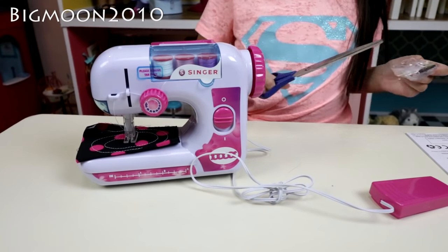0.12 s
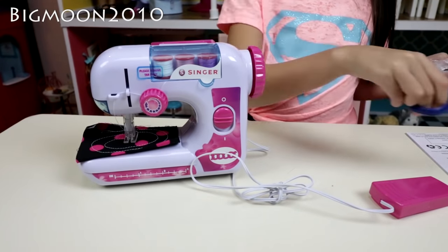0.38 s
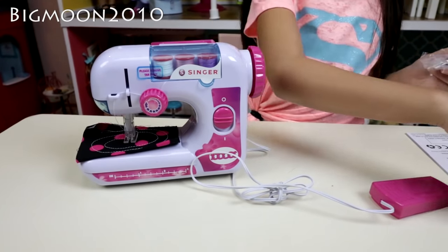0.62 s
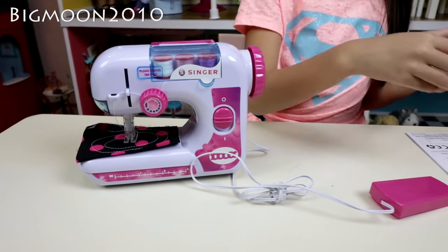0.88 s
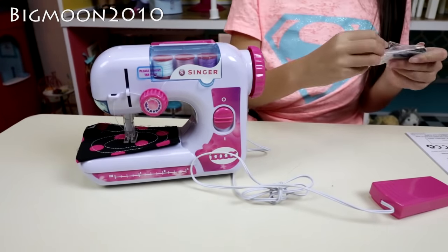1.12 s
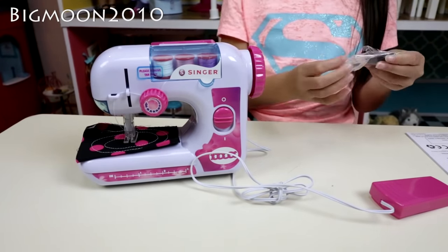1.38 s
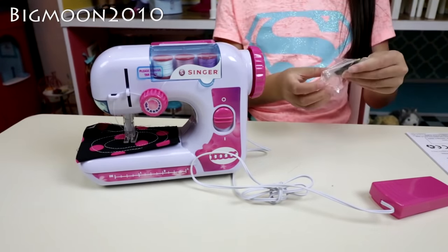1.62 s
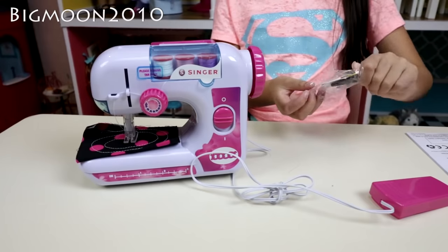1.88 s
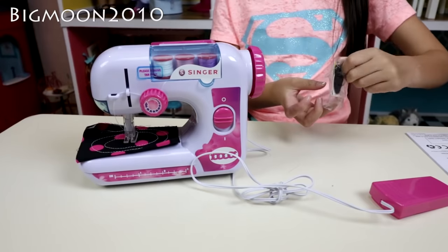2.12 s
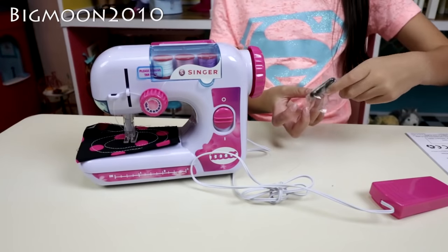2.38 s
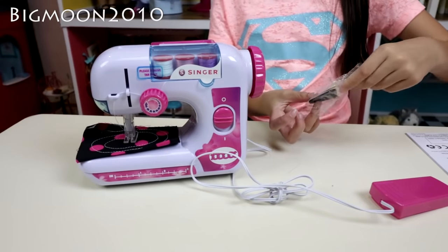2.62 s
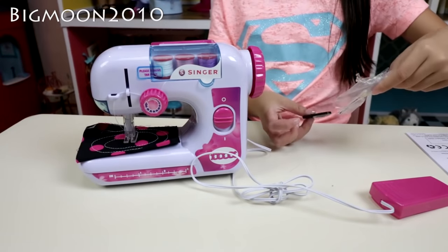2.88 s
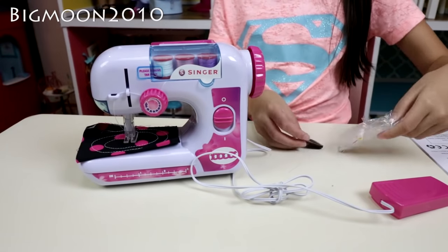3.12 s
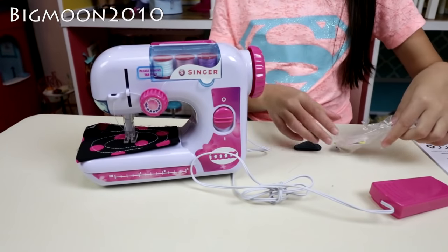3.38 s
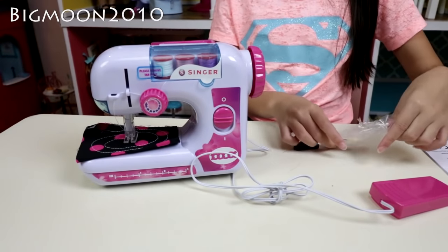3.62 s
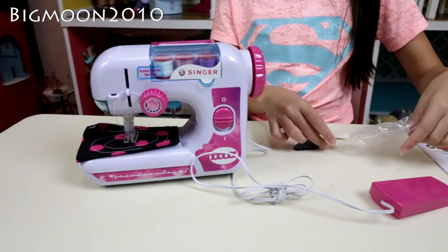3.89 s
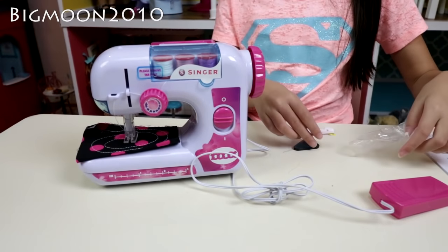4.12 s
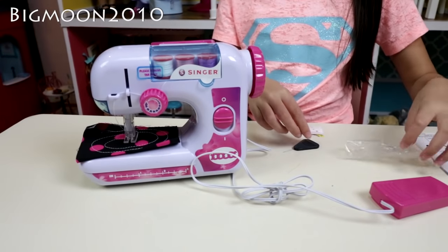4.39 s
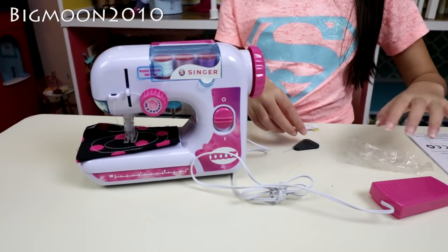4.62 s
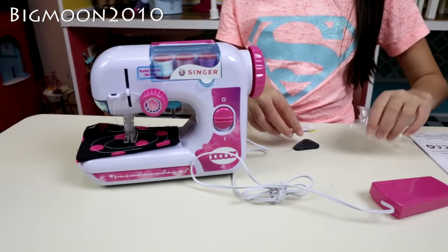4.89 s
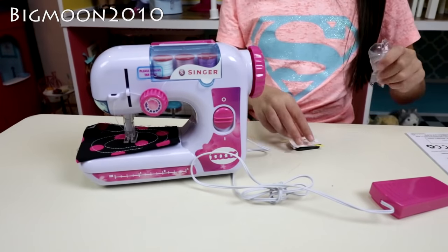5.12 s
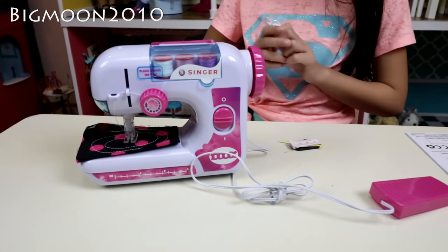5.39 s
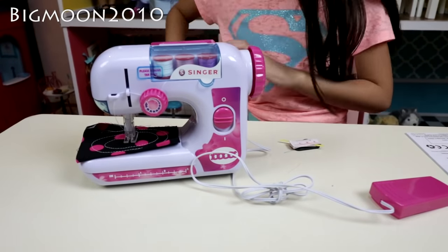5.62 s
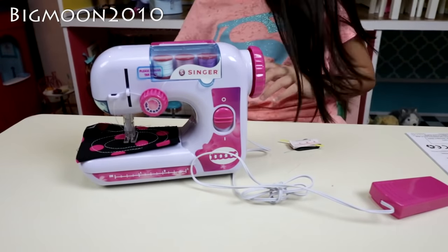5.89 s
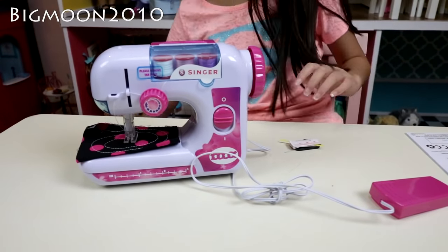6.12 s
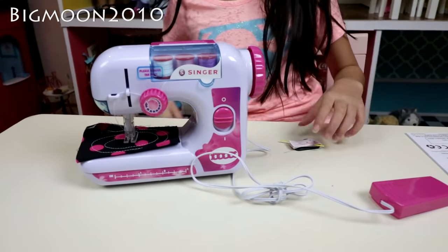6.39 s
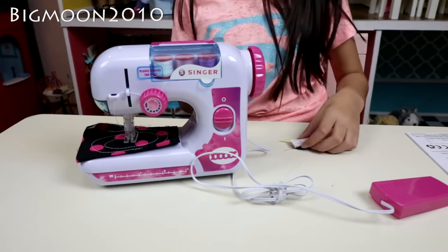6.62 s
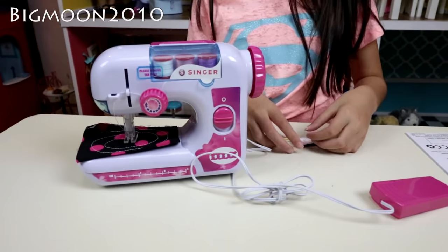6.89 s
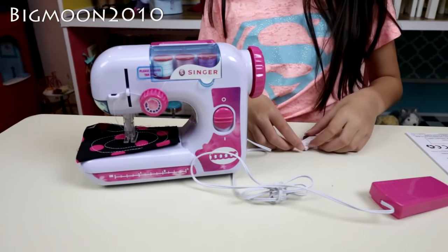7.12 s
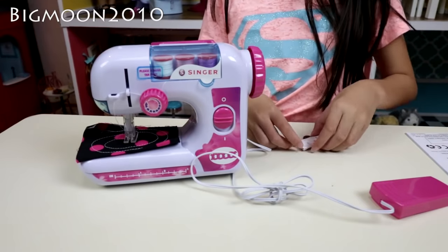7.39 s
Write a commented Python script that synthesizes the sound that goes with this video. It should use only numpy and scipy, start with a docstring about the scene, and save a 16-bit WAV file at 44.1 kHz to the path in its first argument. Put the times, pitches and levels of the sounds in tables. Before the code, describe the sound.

Scissors clatter loudly onto a table, then a thin plastic packet crinkles in crisp irregular bursts, with tiny hard parts ticking down in a small room.

```python
"""A thin plastic packet is crinkled and shaken out by hands at a table in a small furnished room:
film creases snap as short noise puffs with a brief sine ring, over a rustle of tiny random contacts.
Scissors drop and bounce: noise cracks, ringing modes and a slow sway of the board.
Small hard parts tick, ring high and chatter as they slide; the empty packet drops out of sight with a knock.
A stereo pair hears most of it from the right, with dense decaying reflections and steady noise."""
import sys
import numpy as np
from scipy import signal
from scipy.fft import rfft, irfft, next_fast_len
from scipy.io import wavfile

SR = 44100
rng = np.random.default_rng(int(sys.argv[2]) if len(sys.argv) > 2 else 0)


def waveform_to_disk(signal):
    """Save audio, clipped to [-1, 1], as 16-bit WAV at the path in sys.argv[1]."""
    frames = np.transpose(np.atleast_2d(signal))
    scaled = np.clip(frames, -1, 1) * 32767
    samples = np.round(scaled).astype(np.int16)
    wavfile.write(sys.argv[1], SR, samples)


def makeup_ratio(level_db):
    """Linear amplitude ratio for a level in decibels (20 dB per factor of ten)."""
    decades = np.asarray(level_db, float) / 20
    return 10 ** decades


N = 330750   # 7.5 s


def rms_one(x):
    """Scale to rms 1."""
    return x / np.sqrt(np.mean(x ** 2) + 1e-20)


def at_hz(points, hz):
    """Read a (f/Hz, value) table on a log-frequency axis."""
    table_hz, values = np.transpose(points)
    return np.interp(np.log(hz), np.log(table_hz), values)


def coloured(x, spectrum):
    """Equalise x by a (f/Hz, level/dB) table."""
    size = next_fast_len(x.shape[-1])
    hz = np.maximum(np.fft.rfftfreq(size, 1 / SR), 1)
    shaped = rfft(x, size) * makeup_ratio(at_hz(spectrum, hz))
    return irfft(shaped, size)[..., :x.shape[-1]]


# edges of the half-octave noise bands, f/Hz
EDGES_HZ = 25 * 2 ** np.arange(0, 9.6, .5)


def pair(size, likeness):
    """Stereo noise in half-octave bands with a set left-right likeness: (centre Hz, left and right)."""
    white = rng.standard_normal((2, 2, size))
    for k, (low, high) in enumerate(zip(EDGES_HZ, EDGES_HZ[1:])):
        band = signal.butter(2, [low, high], "band", fs=SR, output="sos")
        mid, side = signal.sosfilt(band, white[k % 2])   # neighbouring bands use different noise
        hz = np.sqrt(low * high)
        alike = np.clip(at_hz(likeness, hz), -1, 1)
        yield hz, np.sqrt(1 + alike) * mid + np.sqrt(1 - alike) * side * [[1], [-1]]


# filters for body, middle and edge: low and high corner, f/Hz
BANDS = [signal.butter(2, edges, "band", fs=SR, output="sos")
         for edges in ([200, 1050], [1050, 5000], [5000, 18000])]


def cracks(events, body_ms, middle_ms, edge_ms):
    """Each contact is a puff of noise in three bands, each swelling and dying at its own pace."""
    s, peak_db, body_db, edge_db = np.transpose(events)[:4]
    t, out = np.arange(1500) / SR, np.zeros(N + 1500)
    noise = rng.standard_normal((len(s), 3, len(t)))
    at = (s * SR).astype(int)[:, None] + np.arange(len(t))
    for k, (ms, db) in enumerate(zip((body_ms, middle_ms, edge_ms), (body_db, 0, edge_db))):
        age = 1000 * t / ms
        puff = signal.sosfilt(BANDS[k], age * np.exp(-age) * noise[:, k])
        energy = np.sum(puff ** 2, axis=1, keepdims=True)
        puff /= np.sqrt(energy / (ms * SR / 1000))   # same energy for every draw
        np.add.at(out, at, puff * makeup_ratio(peak_db + db)[:, None])
    return out[:N]


def bursts(clicks, body_ms, middle_ms, edge_ms):
    """Dense click trains swell and fade three bands of noise."""
    out = np.zeros(N)
    for train, ms, band in zip(clicks, (body_ms, middle_ms, edge_ms), BANDS):
        r = np.exp(-1000 / (ms * SR))
        # a unit click lifts the envelope to 1 after ms
        envelope = signal.lfilter([np.e * (1 - r)], [1, -2 * r, r * r], train + 1e-18)
        out += signal.sosfilt(band, envelope * rng.standard_normal(N))
    return out


def grains(level_db, body_db, per_s, size_db):
    """Random tiny contacts as body, middle and edge click trains, following a level in time."""
    born = rng.random(N) < per_s / SR
    shared_db = size_db * np.minimum(rng.exponential(1, N), 4)
    own_db = 3.0 * rng.standard_normal((3, N))   # each band strays by itself
    sizes = born * makeup_ratio(shared_db + own_db)
    return rms_one(sizes) * makeup_ratio(np.array([level_db + body_db, level_db, level_db]))


def ring(clicks, hz, t60):
    """A two-pole resonator: a unit click starts a decaying sine of height 1."""
    r, w = makeup_ratio(-60 / (t60 * SR)), 2 * np.pi * hz / SR
    return signal.lfilter([0, np.sin(w)], [1, -2 * r * np.cos(w), r * r], clicks + 1e-18)


def ringing(events, modes, spread_db):
    """Every blow strikes all modes, each with a strength of its own."""
    s, peak_db, body_db, edge_db = np.transpose(events)[:4]
    chance, out = rng.standard_normal((len(s), len(modes))), np.zeros(N)
    for k, (hz, level_db, t60) in enumerate(modes):
        # body counts fully at 400 Hz, the edge at 9 kHz
        tilt_db = [np.interp(np.log(hz), np.log([400, 2500, 9000]), [b, 0, e])
                   for b, e in zip(body_db, edge_db)]
        clicks = np.zeros(N)
        clicks[(s * SR).astype(int)] = makeup_ratio(peak_db + tilt_db + level_db + spread_db * chance[:, k])
        out += ring(clicks, hz, t60)
    return out


# spectrum of room and microphone noise: f/Hz, relative density level/dB
HUSH = [(15, -34), (25, -16), (53, -6.5), (141, -12.5), (200, -9), (301, -23.5), (335, -11.5), (416, -13),
        (489, -16.5), (775, -20.5), (10400, -28.5), (14400, -40), (16000, -62.5)]
# its left-right likeness: f/Hz, correlation
HUSH_LIKENESS = [(50, 0.26), (300, 0.23), (1000, 0.11), (8000, .05)]


def hush():
    """Steady air and electronics noise, built from shaped half-octave bands."""
    noise = sum(makeup_ratio(at_hz(HUSH, hz)) * band for hz, band in pair(N, HUSH_LIKENESS))
    return makeup_ratio(-64) * rms_one(noise)


# how busily the fingers work the film, before the layer gains: t/s, level/dB
HANDLING = [(0, -55.5), (.1, -73), (1.07, -99), (1.1, -57), (1.35, -53), (1.6, -57.5), (1.65, -74),
            (1.7, -46.5), (1.86, -56), (2.1, -52.5), (2.37, -57), (2.56, -49.5), (2.67, -57.5), (2.76, -44),
            (2.97, -64.5), (3.25, -66), (3.3, -77), (3.62, -66), (3.66, -53), (3.95, -80), (4.36, -73),
            (4.68, -77.5), (4.72, -62.5), (4.86, -79), (4.92, -57.5), (5.14, -61.5), (5.19, -41.5),
            (5.43, -65), (5.47, -48.5), (5.7, -69.5), (5.84, -57), (6.15, -76.5), (6.3, -87.5),
            (7.5, -89.5)]


def handling_db(s):
    """Effort of the fingers at times s, as a level."""
    return np.interp(s, *np.transpose(HANDLING))


def clumps():
    """Quick random swells in dB that bunch the rustle."""
    steps = np.arange(0, N / SR + .1, 0.013)   # s between swell points
    return 4.5 * np.interp(np.arange(N) / SR, steps, rng.standard_normal(len(steps)))


def small_snaps():
    """Lesser creases give way at random, as strongly as the fingers work, each with its own colour."""
    count = int(60 * N / SR)   # 60 per second
    s = rng.random(count) * (N - 400) / SR
    size, body, edge, pitch = np.clip(rng.standard_normal((count, 4)), -1.6, 1.6).T
    peak_db = handling_db(s) + 11.5 + 5 * size
    body_db, edge_db = -13.5 + 8.5 * body, 5 + 8.5 * edge   # against the peak
    crease_hz = 3300 * np.exp(.25 * pitch)
    return np.transpose([s, peak_db, body_db, edge_db, crease_hz])


# the clearest snaps, before the layer gains:
# t/s, peak level/dB, body level/dB and edge level/dB (against the peak), ring of the crease f/Hz
FILM_SNAPS = [(0.0429, -36.5, -23, 4.5, 1125), (0.3263, -41.5, 3.5, 18.5, 4680),
              (0.3306, -38.5, -23, 10.5, 2874), (1.1084, -33, -13, 15, 3230), (1.1126, -34.5, 3, 19, 3500),
              (1.1274, -29, -14, 6, 3260), (1.1572, -32, -33, 9, 3350), (1.1914, -31, -7, 13, 3320),
              (1.1982, -32, -27, 13, 3320), (1.2033, -26, -3, 11.5, 2580), (1.2139, -27.5, -2, 9, 3330),
              (1.2584, -28.5, -13, -20, 3350), (1.3062, -26.5, -36, 1, 3460), (1.328, -26.5, 2.5, 9, 3260),
              (1.3678, -37.5, -17, 15, 3490), (1.386, -32, 6.5, 18, 2500), (1.4108, -25.5, -23, 12, 2800),
              (1.4716, -24.5, -19, 10, 2670), (1.538, -31, -2, 15, 2700), (1.5466, -25.5, -5, -4, 2880),
              (1.5804, -26, -2.5, 10.5, 3300), (1.6015, -28, 2, 8, 3200), (1.6972, -29.5, 3, -7, 3880),
              (1.7151, -30.5, -3, -16, 3820), (1.7285, -27.5, 0, -6, 3060), (1.747, -26.5, -13, 1.5, 2680),
              (1.7756, -24.5, -10, -16.5, 3020), (1.8001, -32, -4.5, 11, 2970),
              (1.8429, -30, -11, 14, 2870), (1.8522, -24, -2, 13.5, 2970), (1.8619, -32, -34, 8, 3350),
              (1.9176, -40, -21, 17, 4570), (1.9865, -38, -23, 25, 2240), (1.9917, -26.5, -27, -11, 3450),
              (2.0069, -42, -21, -1.5, 3620), (2.021, -29, -15, -13, 2910), (2.0455, -41.5, 8, 20.5, 4090),
              (2.0625, -49, 2, 11, 3960), (2.1564, -29.5, -49, 15.5, 1360), (2.2185, -28.5, 1, -14, 2980),
              (2.2567, -27, -2, 8, 4100), (2.2597, -26.5, -38, 9, 3270), (2.2852, -26, -37, 9.5, 1320),
              (2.302, -23.5, -29.5, 6.5, 4300), (2.324, -34.5, -22, 19, 4390), (2.3365, -24.5, 0, -2, 3600),
              (2.3476, -26.5, -10, 11.5, 3140), (2.3762, -22, -9, 6.5, 4940), (2.3897, -30, -11, -3, 1160),
              (2.4542, -38, 9, 11, 2800), (2.4766, -28, -20, 4, 3800), (2.5628, -23, -1.5, 11, 4450),
              (2.5675, -26, -19, -2, 4280), (2.5819, -23, -20, 10, 4130), (2.7141, -23.5, -28, 3.5, 3540),
              (2.7469, -29, -24, -5, 4350), (2.7515, -25.5, 1, 10, 3240), (2.7638, -24, -8, -11, 4520),
              (2.8257, -24, -10, -4.5, 3430), (2.8679, -27, -5, -12, 3560), (2.8767, -35.5, -30, 24, 4870),
              (2.8944, -27, -6, -14, 3660), (2.9567, -33, -0.5, 6, 2800), (3.1616, -39, -7, 1, 3200),
              (3.1927, -37.5, -12, 10, 1720), (3.6763, -31, -28, -5.5, 3800),
              (3.6817, -30.5, -16, -1, 3870), (3.7025, -29, 3.5, 12, 2940), (3.7822, -42, -9, 16, 2760),
              (3.8175, -29.5, -7, 4.5, 3340), (3.88, -32, -1, 1, 2460), (4.0358, -53.5, -1, 27.5, 5020),
              (4.163, -44, -10, -14, 1690), (4.1889, -46, 10.5, -3, 1140), (4.5581, -46.5, -14, 10, 1720),
              (4.7189, -42, 8.5, 7, 2960), (4.8882, -35.5, -2, 5.5, 3460), (4.9091, -26.5, -13, 5, 2260),
              (4.9239, -32, -20, 20, 5000), (4.9269, -22.5, -11, -3, 2830), (4.9602, -34, -14, -14, 2740),
              (4.9971, -25, -34, 9.5, 3450), (5.0199, -29.5, 4, 13.5, 1750),
              (5.0964, -33.5, -5, 12.5, 1730), (5.0994, -33, -2, 16, 3440), (5.159, -40, -11, 21.5, 3530),
              (5.1878, -22, -10, 7, 4600), (5.1932, -34, -3, 14, 4830), (5.2033, -40, -34, 22, 3660),
              (5.2158, -39, -15, 18, 2050), (5.2405, -33.5, -13, 19, 2930), (5.2963, -28.5, 6, 13.5, 3880),
              (5.3106, -24.5, -23, 6, 2870), (5.3148, -27.5, -24, 18.5, 2800), (5.3785, -26, -23, 10, 2860),
              (5.4406, -31.5, -25, -11, 2930), (5.4885, -24, -25, -10, 3920), (5.5169, -23, -44, 1, 4120),
              (5.5608, -38, -15, 17, 2710), (5.6146, -28.5, -7, 9, 3660), (5.6281, -26, -12, 9, 3560),
              (5.6646, -33, -16, 12.5, 3570), (5.7562, -39.5, -12, 5, 3600), (5.7637, -46.5, -12, 24, 1880),
              (5.8438, -31, -2.5, 13.5, 2720), (6.0859, -40.5, -22.5, -11, 3350),
              (6.5801, -42.5, -16.5, 13, 3770), (6.722, -37.5, 2.5, 5, 2120)]
# colour of the film's sound: f/Hz, level/dB
FILM = [(150, -14.5), (400, 0.5), (1300, -1.5), (2500, -1), (3800, 3), (5200, 2.5), (7000, 6), (11000, 0),
        (14000, -6), (16000, -9)]


def packet():
    """Creases of the film snap over in about a millisecond; countless small ones make the rustle."""
    effort_db = handling_db(np.arange(N) / SR) + clumps()
    contacts = grains(effort_db, body_db=-3, per_s=800.0, size_db=3.0)
    rustle = bursts(contacts, body_ms=0.91, middle_ms=0.66, edge_ms=0.51)
    creases = np.vstack([FILM_SNAPS, small_snaps()])
    snaps = makeup_ratio(-8.5) * cracks(creases, body_ms=0.38, middle_ms=0.69, edge_ms=0.47)
    t = np.arange(400) / SR
    for s, peak_db, body_db, edge_db, hz in creases:   # the freed panel rings for a few cycles
        at = int(s * SR)
        fade_db = -60 * t * hz / 15.3   # down 60 dB in 15.3 cycles
        snaps[at:at + len(t)] += makeup_ratio(peak_db + 1.0 + fade_db) * np.sin(2 * np.pi * hz * t)
    return coloured(makeup_ratio(-18.0) * rustle + snaps, FILM)


# blows on the table, before the layer gains: t/s, peak level/dB,
# then against the peak: body level/dB, edge level/dB, sway of the board level/dB
TABLE_BLOWS = [(.688, -7, -12, 2.5, -19.5), (.691, -28, -16, -28, -39), (.724, -20, -7, -15, -11),
               (0.818, -20.5, -8, -7, -23.5), (.889, -0.5, -8, 1, -36), (.891, -19.5, 1, -18, -24),
               (.92, -26, -11, -3, -28), (.927, -9.5, -6, 0, -18), (3.66, -50.5, 11, -10, 1),
               (4.361, -37.5, -2.5, 18, -17.5), (4.905, -43.5, -3, -13, 0.5), (5.19, -49.5, 7, -5, -13),
               (6.598, -50.5, 6, -15.5, 2), (6.626, -48.5, 8, -23, -4), (6.646, -46.5, 6, -10, 2),
               (7.037, -48.5, 7.5, -8, 5)]
# modes of the top and the blades: f/Hz, level/dB, t60/s
TABLE = [(237, -8, 0.23), (319.7, -8.5, 0.077), (415, -3.5, 0.11), (466.2, -5, 0.13), (670, 1.5, 0.089),
         (757, 4, .08), (926, -4, 0.091), (1180, -1.5, 0.056), (1195, -5.5, 0.085), (1560, -1.5, 0.05),
         (2176, 0, 0.06), (2910, 2.5, 0.035), (3000, -3.5, 0.04), (3460, -3.5, 0.073), (3880, 3.5, 0.038),
         (3910, -15, 0.017), (6700, 1, 0.029), (7900, -7, 0.022)]
# slow modes of the whole board: f/Hz, level/dB, t60/s
TABLE_SWAY = [(74.6, 0, 0.24), (132, -13.5, 0.51), (187, -6.5, 0.45)]


def table():
    """Scissors and knuckles on the table: a crack, the top and the blades ring, the whole board sways."""
    crack = cracks(TABLE_BLOWS, body_ms=1.5, middle_ms=1.12, edge_ms=0.56)
    crack = coloured(crack, [(8000, -3.0), (15000, -12.5)])
    s, peak_db, body_db, edge_db, sway_db = np.transpose(TABLE_BLOWS)
    push = np.zeros(N)
    push[(s * SR).astype(int)] = makeup_ratio(peak_db + sway_db)
    push_samples = .006 * SR   # the board yields slowly, over 6 ms
    push = signal.lfilter(np.hanning(int(push_samples)) / (push_samples / 2), 1, push)
    sway = sum(makeup_ratio(db) * ring(push, hz, t60) for hz, db, t60 in TABLE_SWAY)
    modes = ringing(TABLE_BLOWS, TABLE, spread_db=3.5)
    return crack + makeup_ratio(-17.0) * modes + makeup_ratio(-5.0) * sway


# parts pushed along the table, before the layer gains:
# start t/s, length t/s, top level/dB, body level/dB (against the top)
SLIDES = [(5.208, .04, -52, -17), (6.575, 0.073, -64.5, -11), (6.642, 0.3, -66.5, -13),
          (7.184, 0.39, -65, -13.5)]


def sliding():
    """Level and body of the slides in time: each swells quickly and fades."""
    t, level_db, body_db = np.arange(N) / SR, np.full(N, -200.), np.zeros(N)
    for s, length, top_db, low_db in SLIDES:
        now = (t >= s) & (t < s + length)
        share = (t[now] - s) / length
        level_db[now] = top_db + np.interp(share, [0, 0.13, 1], [-10, 0, -15])
        body_db[now] = low_db
    return level_db, body_db


# clicks of small parts, before the layer gains:
# t/s, peak level/dB, body level/dB and edge level/dB (against the peak)
PART_CLICKS = [(3.2575, -20, -44, -3), (3.271, -25, -31, 4), (3.315, -39, -12, -10),
               (3.3225, -26, -27, -0.5), (3.3415, -30.5, -6, -1), (3.3815, -19, -47, -4),
               (3.3842, -17, -40, -1.5), (3.388, -36, -36, 0), (3.4222, -20.5, -46, 5.5),
               (3.425, -25, -38, -2), (6.871, -47, -29.5, 0.5), (6.8805, -29, -31, 5), (7.021, -35, -19, 7),
               (7.025, -44, -7, 12), (7.0742, -18, -36, 15.5), (7.0775, -18.5, -58, 13),
               (7.0845, -17, -21, 4), (7.311, -26.5, -32, 0), (7.315, -34.5, -25, 5),
               (7.319, -31, -16, -27)]
# modes of the parts: f/Hz, level/dB, t60/s
PART = [(1170, -4, 0.049), (2160, -14.5, 0.011), (4980, -0.5, 0.023), (4850, -5, 0.016),
        (5900, -3.5, 0.013), (6140, 1.5, 0.02), (8080, 0.5, 0.035), (10200, -15, 0.004), (10730, 1, 0.01),
        (12040, -13, .006)]
# colour of ticks and rubbing: f/Hz, level/dB
PART_TICK = [(1000, 4.5), (2500, 0.5), (5000, 3.5), (11000, -1), (15000, -13.5)]


def parts():
    """Small hard parts tick on the table and ring high; pushed along, they chatter into the same modes."""
    tick = cracks(PART_CLICKS, body_ms=0.21, middle_ms=0.4, edge_ms=0.76)
    rub = grains(*sliding(), per_s=5000, size_db=1.5)
    chatter = sum(makeup_ratio(db) * ring(rub[1] * rng.standard_normal(N), hz, t60) for hz, db, t60 in PART)
    slide = makeup_ratio(-7) * bursts(rub, body_ms=1, middle_ms=.3, edge_ms=.4) + makeup_ratio(-16) * chatter
    clink = makeup_ratio(-9.5) * ringing(PART_CLICKS, PART, spread_db=2)
    return coloured(makeup_ratio(-4.0) * tick + slide, PART_TICK) + clink


# the landing, before the layer gains:
# t/s, peak level/dB, body level/dB and edge level/dB (against the peak)
DROP = [(6.266, -32.5, -0.83, -9)]
# modes of the hollow container: f/Hz, level/dB, t60/s
BIN = [(397, -10, 0.034), (436, 2.5, 0.086), (488, -3.5, 0.048), (894, -7.5, 0.038)]


def drop():
    """The packet lands in a hollow container below the table: a noise puff and low modes, a dull knock."""
    knock = cracks(DROP, body_ms=2.1, middle_ms=4.0, edge_ms=14.0)
    return makeup_ratio(-8.5) * knock + makeup_ratio(-7.5) * ringing(DROP, BIN, spread_db=3.0)


def heard_from(x, lag_samples, bass_db, treble_db):
    """The sound reaches the far (left) port later and with its own tilt; the near one gets it plain."""
    late = np.interp(np.arange(N) - lag_samples, np.arange(N), x)
    return np.array([coloured(late, [(600, bass_db), (14000, treble_db)]), x])


# decay of the room: f/Hz, t60/s
ROOM_T60 = [(60, 0.44), (200, 0.33), (1000, 0.48), (4000, 0.33), (12000, 0.33)]
# left-right likeness of the reflections: f/Hz, correlation
ROOM_LIKENESS = [(100, 1), (300, 0.17), (1000, 0.11), (8000, 0.027)]
# what the room gives back: f/Hz, level/dB
WALLS = [(100, -8.5), (500, 0.5), (2000, -2.07), (6000, -7.5), (14000, -5.5)]


def room(x, gap_ms):
    """Dense reflections, tinted by the walls, after a short gap, dying band by band."""
    size = int(.7 * SR)
    t = np.arange(size) / SR
    echoes = sum(band * makeup_ratio(-60 * t / at_hz(ROOM_T60, hz)) for hz, band in pair(size, ROOM_LIKENESS))
    echoes = echoes * np.clip(1000 * t / gap_ms - 1, 0, 1)   # silent for one gap, full after two
    echoes = echoes / np.sqrt(np.sum(echoes ** 2) / 2)
    return signal.fftconvolve(coloured(x, WALLS)[None], echoes, axes=1)[:, :N]


def scene():
    """All sources, their room and the hush."""
    film, knocks, ticks, fall = packet(), table(), parts(), drop()
    direct = heard_from(film, lag_samples=3.66, bass_db=0.0, treble_db=-9)
    direct += heard_from(knocks, lag_samples=4.38, bass_db=-1.2, treble_db=-15)
    direct += heard_from(ticks, lag_samples=3.22, bass_db=-8.5, treble_db=-7)
    # ports swapped: the drop is nearer the left one
    direct += heard_from(fall, lag_samples=1.5, bass_db=1.0, treble_db=-10)[::-1]
    sent = makeup_ratio(-4) * film + makeup_ratio(-4) * knocks + makeup_ratio(-3.0) * ticks + makeup_ratio(9.0) * fall
    sounds = direct + room(sent, gap_ms=0.8)
    low_cut = signal.butter(4, 72, "high", fs=SR, output="sos")   # on all sounds and their room
    return signal.sosfilt(low_cut, sounds) + hush()


def band_limit(x):
    """A steep low-pass at the top of the band."""
    return signal.sosfilt(signal.butter(12, 16390, fs=SR, output="sos"), x)


def record(dry):
    """The top rolls off above 15 kHz; anything beyond full scale is clipped."""
    top = signal.butter(10, 15000, fs=SR, output="sos")
    mix = np.clip(signal.sosfilt(top, dry), -1, 1)
    return band_limit(mix)


dry = scene()
out = record(dry)
waveform_to_disk(out)
```